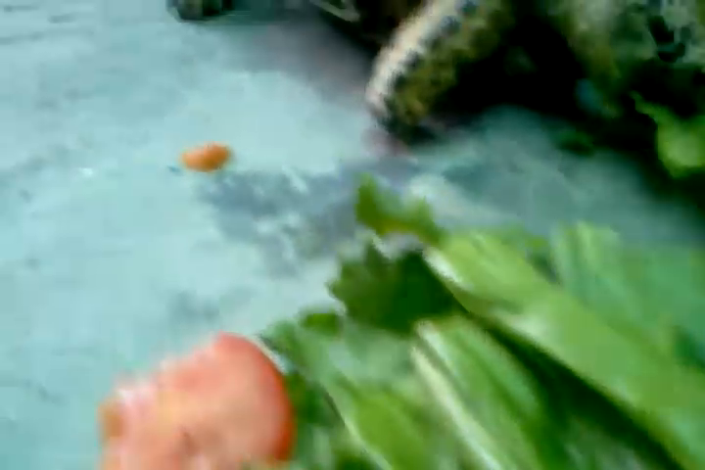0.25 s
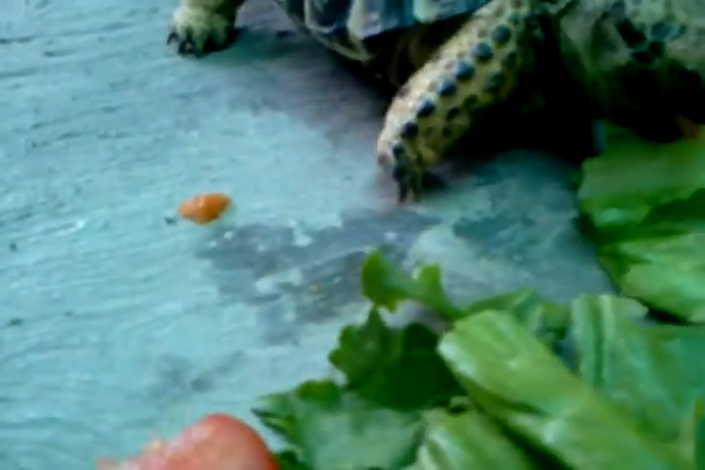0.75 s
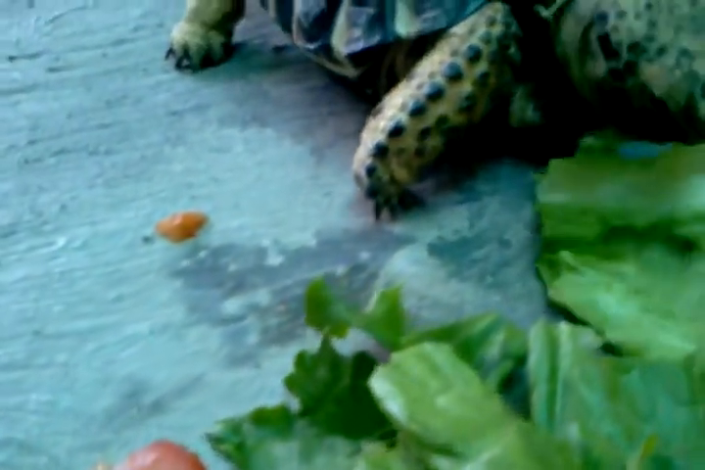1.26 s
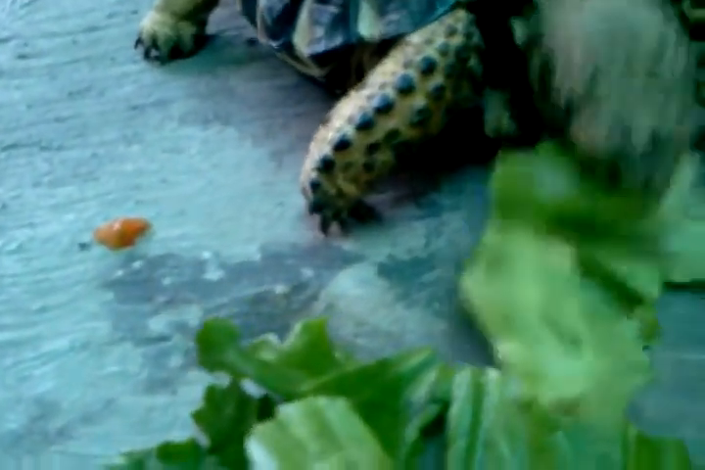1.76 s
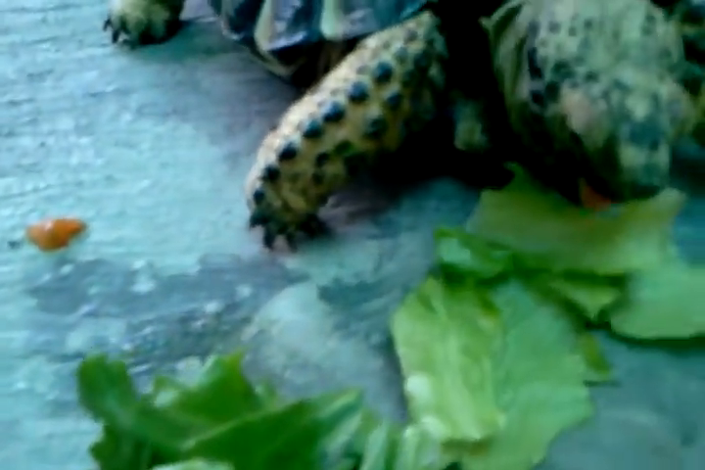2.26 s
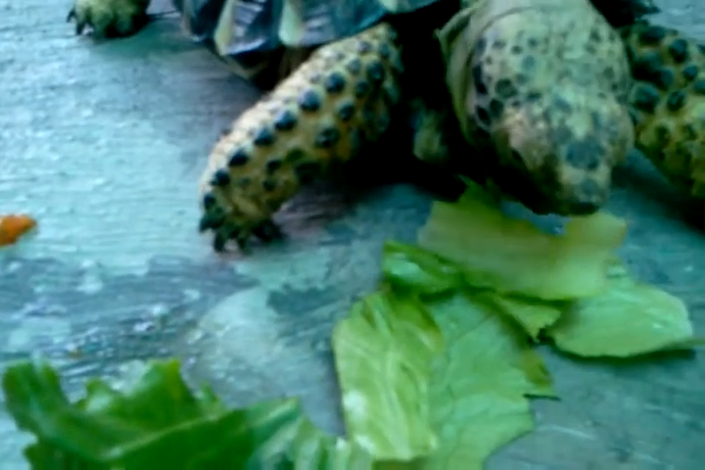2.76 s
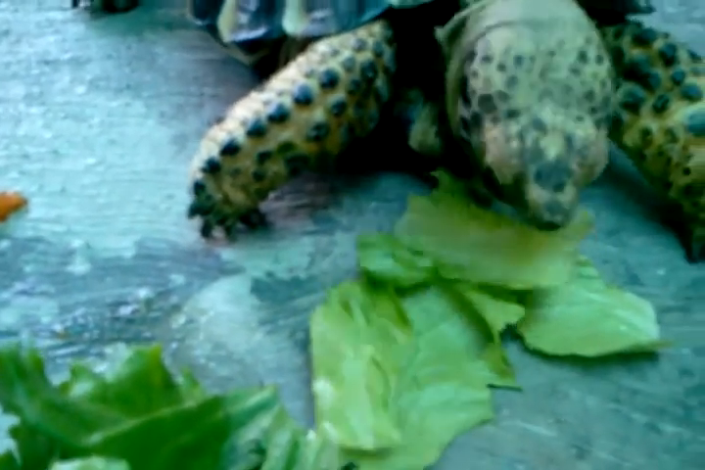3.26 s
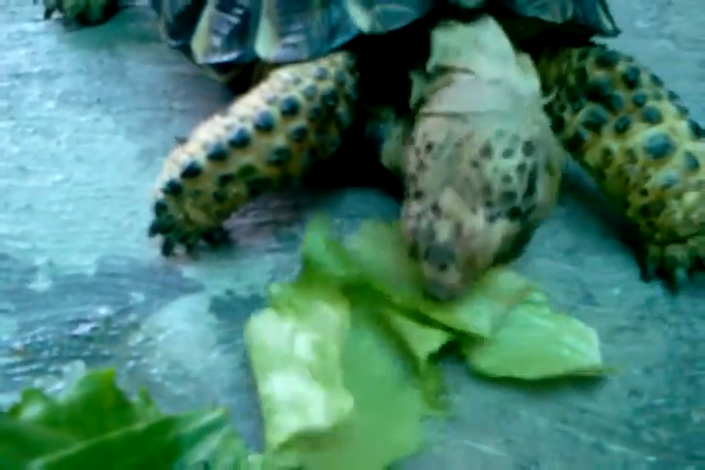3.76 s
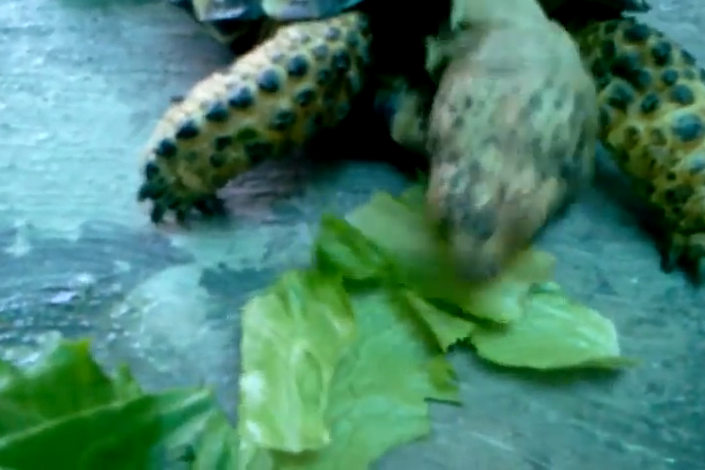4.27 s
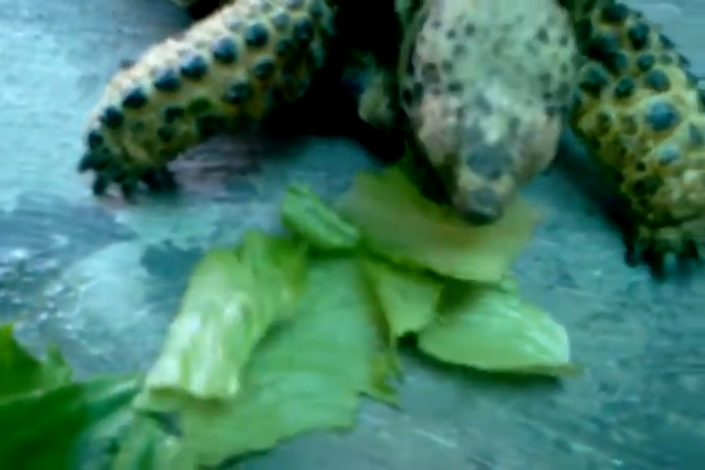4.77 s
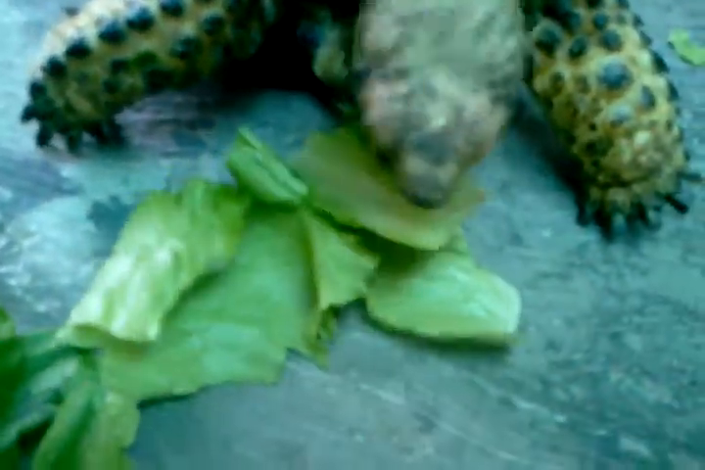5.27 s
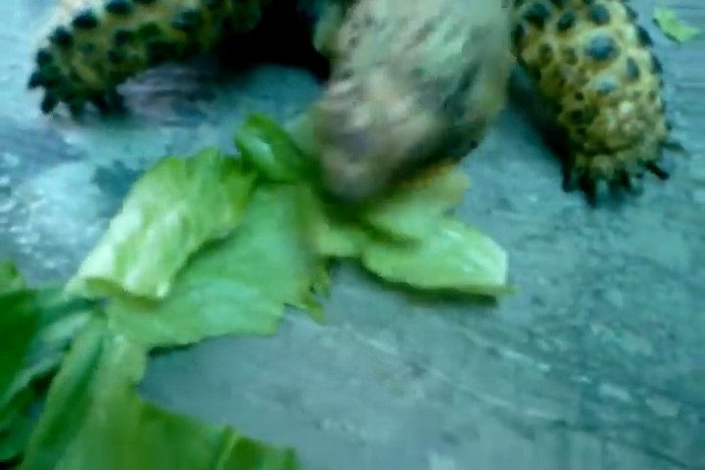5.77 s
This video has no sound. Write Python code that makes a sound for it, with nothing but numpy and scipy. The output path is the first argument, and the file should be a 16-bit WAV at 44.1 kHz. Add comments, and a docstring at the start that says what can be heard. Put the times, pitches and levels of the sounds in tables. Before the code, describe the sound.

Close to a small camera microphone in a quiet, bare-walled room, a tortoise eats lettuce on a hard floor. Short, dry, crisp bites come roughly every 0.7 seconds, some doubled, each a tiny burst of crackling leaf and snapping rib. After a pause with only faint leaf drags and ticks, three more bites follow. Low rumble, faint hum and hiss run throughout.

```python
"""A tortoise eats lettuce on a hard floor indoors, close to a small camera: rumble, faint hum and hiss throughout.
Leaf drags faintly at 0.08 s; bites follow from 0.3 to 3.2 s, about 0.7 s apart, some doubled, with faint drags.
A gap with two more drags precedes the last three bites, at 4.5, 5.2 and 5.9 s. The room answers briefly.
Each bite crushes leaf (random cell bursts through resonances); ribs snap (decaying noise through resonances)."""
import sys
import numpy as np
from scipy import signal
from scipy.fft import rfft, irfft, next_fast_len
from scipy.io import wavfile
from scipy.ndimage import map_coordinates

SR = 44100
rng = np.random.default_rng(int(sys.argv[2]) if len(sys.argv) > 2 else 0)


def unload_wav(signal):
    """Save mono or channel-first audio to the path in sys.argv[1] as 16-bit WAV at rate SR, clipped to [-1, 1]."""
    wavfile.write(
        sys.argv[1],
        SR,
        np.round(np.clip(np.atleast_2d(signal).T, -1, 1) * 32767).astype(np.int16),
    )


N = 265923

# Room rumble spectrum, scaled to rms 1 in use: [freq_hz, relative_density_db]
RUMBLE_SPECTRUM = [(22, -13), (42, -2.5), (54, -10.5), (63, -9.5), (78, -3), (100, -9.5), (124, -5.5),
                   (165, -9), (210, -6), (300, -12.5), (470, -12.5), (640, -17), (1500, -24.5),
                   (3000, -44.5)]
# Microphone hiss spectrum, peak at its port resonance, scaled to rms 1 in use: [freq_hz, relative_density_db]
HISS_SPECTRUM = [(300, -15), (1800, -6), (3300, -9), (4200, -9), (4650, -4), (5000, 1.5), (5400, -8.5),
                 (6000, -12.5), (7300, -14.5), (8000, -18.5), (9000, -38.5)]
# Appliance hum lines; a random sway adds to the level: [freq_hz, start_rms_db, end_rms_db, phase_drift_rad]
HUM_LINES = [(119.8, -54.5, -57.5, .9), (135.1, -62.5, -55, 1.5), (687, -72, -66.5, 2.2),
             (875.6, -65, -64.5, 0.96)]
# Colour of the room's answer: [freq_hz, relative_level_db]
ROOM_COLOUR = [(500, -4.5), (2200, 5.5), (3200, 2.5), (4900, 1), (6000, 0), (7200, 2), (9000, 4.5)]
# Room decay: [freq_hz, t60_s]
ROOM_DECAY = [(500, 0.2), (4500, 0.41), (9000, 0.34)]
# Colour of the leaf sounds at the microphone: [freq_hz, gain_db]
PRESENCE = [(600, -3), (1100, -0.5), (2100, -0.5), (2800, -1.5), (3600, 2.5), (5000, 0.5), (6200, -1.5),
            (7200, 3.5), (7900, -1), (8700, -1.5)]
# Loose leaves dragged over the floor, level before trim: [start_s, length_s, level_db, pitch_hz]
DRAGS = [(0.084, 0.15, -58.5, 7300), (0.958, 0.075, -56.5, 5200), (2.496, .042, -54, 5000),
         (3.506, .044, -54.5, 4700), (3.757, 0.086, -55.5, 4580)]
# Bites and tugs, crackle level before trim, crisp width before spread; grip and knock relative:
# [start_s, length_s, crackle_db, grip_db, crisp_hz, crisp_width_hz, knock_db, knock_hz, knock_width_hz]
BITES = [(.275, 0.049, -38.5, -5, 5800, 2100, -9, 1930, 1700),
         (1.076, 0.034, -43.5, -10.5, 5760, 850, -19, 1930, 1390),
         (1.723, .042, -38.5, -9.5, 5150, 1250, -9, 1680, 1100),
         (1.794, 0.015, -33, -14, 5400, 1700, -7.5, 1770, 1110),
         (2.457, 0.012, -45.5, -15, 4980, 1100, -9, 1270, 800),
         (3.121, 0.033, -44.5, -16, 4840, 1300, -10, 1450, 1200),
         (3.173, 0.018, -46.5, -18, 5000, 850, -9, 1050, 700),
         (4.476, 0.036, -32.5, -14.5, 5130, 1340, -13.5, 1860, 1400),
         (5.162, 0.038, -48, -7.5, 4650, 1510, -18, 2020, 600),
         (5.861, 0.035, -39.5, -18.5, 4460, 1500, -9.5, 2080, 596)]
# Rib and edge snaps, loud ones in the bites and faint ticks between;
# crisp level over 1 ms, knock relative to it: [start_s, level_db, crisp_hz, knock_db, t60_s]
SNAPS = [(0.2618, -32.5, 6400, -4, 0.0022), (.2686, -35, 5870, -16, 0.0018),
         (0.2777, -14.5, 6200, -14, 0.0051), (0.2844, -27, 6700, -16, .003), (0.2953, -26, 6700, -9, .002),
         (.3012, -31.5, 5600, -6, 0.0016), (0.3092, -20, 5470, -3, 0.0049), (0.3202, -30, 6300, -15, 0.008),
         (0.3571, -27.5, 6800, -6, 0.0052), (0.7014, -44.5, 4030, -7, .003), (.83, -46, 5700, -13, .004),
         (1.0764, -37.5, 6640, -17, 0.0026), (1.0911, -31, 6300, -17, .002),
         (1.1078, -19.5, 5500, -35, 0.0092), (1.1128, -32, 5400, -23, 0.0029),
         (1.2137, -37, 5960, -11, 0.0023), (1.6794, -33.5, 5400, -18, 0.0023),
         (1.6877, -37, 5560, -18, .003), (1.7242, -23, 5050, -15, 0.0031), (1.7336, -28, 5030, -12, .0023),
         (1.738, -18, 5300, -13, 0.011), (1.7488, -26, 5300, -8, .004), (1.7551, -18, 4700, -3, 0.005),
         (1.7637, -21.5, 4730, -10, 0.011), (1.784, -29, 4060, -5.5, .002),
         (1.7952, -27.5, 4800, -2.5, 0.0014), (1.81, -31, 5100, -13, .0025), (1.82, -34, 5960, -7, 0.0025),
         (2.2925, -45, 5600, -11, 0.0022), (2.4577, -33, 5400, -7.5, 0.019),
         (2.944, -39, 5560, -25, 0.0012), (3.0164, -44.5, 4700, -8, .0015), (3.1225, -39, 4600, -8, 0.0054),
         (3.1747, -29, 5600, -6.5, 0.0049), (3.1805, -29.5, 4770, -23, .004),
         (3.1917, -35, 4980, -22, 0.0078), (4.211, -48, 5960, -15, .003), (4.4776, -25, 5450, -5, 0.0032),
         (4.4888, -20.5, 5500, -10, 0.0022), (4.4971, -24.5, 5540, -11, .003),
         (4.5039, -19, 4870, -15, 0.0016), (4.5094, -25, 5000, -23, 0.0019),
         (4.5291, -33, 4770, -11, .0026), (4.536, -33.5, 4700, -14, .002), (4.6265, -42.5, 4700, -8, .003),
         (4.689, -44, 4630, -4, 0.0031), (5.1609, -39.5, 4000, -4, .004), (5.182, -25, 4630, -3.5, 0.02),
         (5.8677, -32.5, 4200, -16, .004), (5.902, -29, 4370, 0, 0.014)]

# Bite pressure: grip swells, presses home, holds, lets go; the torn leaf crackles on, fading
GRIP_S, GRIP_SWELL_DB, PRESS_S, LET_GO_S = 0.065, 8.5, 0.0061, 0.0092
AFTER_DB, AFTER_FADE_DB_PER_S = -11, 230
TOP_HZ = 9200  # nothing passes above


def amp(db):
    """Decibels to gain."""
    return 10 ** (np.asarray(db) / 20)


def unit(x):
    """Scale to rms 1."""
    return x / np.sqrt(np.mean(x ** 2) + 1e-20)


def along(points, hz):
    """Interpolate (Hz, value) points on a log-frequency axis."""
    freq_hz, values = np.transpose(points)
    return np.interp(np.log(hz + 1), np.log(freq_hz), values)


def wobble(knots_per_s):
    """Smooth random curve through normal-distributed knots."""
    knots = rng.standard_normal(int(N * knots_per_s / SR) + 4)
    return map_coordinates(knots, [np.arange(N) * knots_per_s / SR])


def filtered(x, response):
    """Multiply the spectrum of x by a response of frequency."""
    size = next_fast_len(N + SR // 2)
    hz = np.fft.rfftfreq(size, 1 / SR)
    return irfft(rfft(x, size) * response(hz), size)[:N]


def noise(spectrum):
    """Steady noise of rms 1 with the given colour."""
    return unit(filtered(rng.standard_normal(N), lambda hz: amp(along(spectrum, hz))))


def ring(x, hz, width_hz, order=1):
    """Pass x through one resonance; rms 1."""
    edges_hz = np.clip([hz - width_hz / 2, hz + width_hz / 2], 100, SR / 2 - 100)
    sos = signal.butter(order, edges_hz, "bandpass", fs=SR, output="sos")
    return unit(signal.sosfilt(sos, x))


def add(track, start_s, x):
    """Mix x into the track at start_s."""
    part = track[max(round(start_s * SR), 0):][:len(x)]
    part += x[:len(part)]


def background(rumble_db=-49, hiss_db=-58.0, sway_db=2):
    """Coloured-noise rumble and hiss; hum sines that waver in phase and strength."""
    t = np.arange(N) / SR
    hum = np.zeros(N)
    for hz, start_db, end_db, drift_rad in HUM_LINES:
        level = amp(np.linspace(start_db, end_db, N) + sway_db * wobble(3.926))
        phase_rad = 2 * np.pi * hz * t + drift_rad * wobble(8)
        hum += level * np.sqrt(2) * np.sin(phase_rad)
    rumble = amp(rumble_db + 0.16 * wobble(5)) * noise(RUMBLE_SPECTRUM)
    hiss = amp(hiss_db + 0.28 * wobble(15.0)) * noise(HISS_SPECTRUM)
    return rumble + hum + hiss


def room(x, delay_s=0.003):
    """Diffuse tail from bare walls: noise decaying at a rate set by frequency."""
    hz, t, grains = signal.stft(rng.standard_normal(SR // 2), SR, nperseg=256)
    decay_db = 60 * t / along(ROOM_DECAY, hz)[:, None]
    shape_db = along(ROOM_COLOUR, hz)[:, None] - decay_db
    tail = signal.istft(grains * amp(shape_db), SR, nperseg=256)[1]
    # silent for delay_s, full after twice that
    tail *= np.clip(np.arange(len(tail)) / SR / delay_s - 1, 0, 1)
    return signal.fftconvolve(x, tail / np.linalg.norm(tail))[:N]


def settling(ticks_per_s=7, scatter_db=4, level_db=-75, hz=5200, width_hz=3200):
    """Loose leaves shift: very faint random ticks through one resonance."""
    sizes = amp(scatter_db * np.clip(rng.standard_normal(N), -2, 1))
    ticks = (rng.random(N) < ticks_per_s / SR) * sizes
    return amp(level_db) * ring(ticks, hz, width_hz, order=2)


def crackle(pressure, hz, knock_db, knock_hz, knock_width_hz, cells_per_s, scatter_db,
            width_hz=1700, edge_db=-5, edge_hz=5500, edge_width_hz=4600):
    """Cells burst at random: cracks of uneven size, shaped by pressure, through the leaf's resonances."""
    size = len(pressure)
    bursts = rng.random(size) < cells_per_s / SR
    sizes = amp(scatter_db * np.clip(rng.standard_normal(size), -2, 2))
    # random signs make three independent drives
    crack, edge, push = pressure * bursts * sizes * rng.choice([-1, 1], (3, size))
    broad = amp(edge_db) * ring(edge, edge_hz, edge_width_hz)
    crisp = unit(ring(crack, hz, width_hz, order=2) + broad)
    knock = amp(knock_db) * ring(push, knock_hz, knock_width_hz, order=2)
    return np.sqrt(np.mean(pressure ** 2)) * (crisp + knock)


def dragging(swell_share=0.21, fade_s=0.012, trim_db=-2):
    """A dragged leaf crackles more thinly than a bitten one; it swells gradually and stops quickly."""
    track, t = np.zeros(N), np.arange(SR // 5) / SR
    for start_s, length_s, level_db, hz in DRAGS:
        swell = t / (swell_share * length_s)
        fade = (length_s - t) / fade_s + 0.5
        pressure = np.clip(np.minimum(swell, fade), 0, 1)
        cells = crackle(pressure, hz, knock_db=-14, knock_hz=1700, knock_width_hz=1700,
                        cells_per_s=1100, scatter_db=3)
        add(track, start_s, amp(level_db + trim_db) * cells)
    return track


def crushing(trim_db=-0.5, spread=1.14):
    """The beak grips, presses and lets go; the many cells spread wider in pitch than one rib."""
    track, t = np.zeros(N), np.arange(SR // 3) / SR - GRIP_S
    for (start_s, length_s, crackle_db, grip_db, hz, width_hz,
         knock_db, knock_hz, knock_width_hz) in BITES:
        times_s = [-GRIP_S, -PRESS_S, 0, length_s, length_s + LET_GO_S]
        levels_db = [grip_db - GRIP_SWELL_DB, grip_db, 0, 0, AFTER_DB]
        pressure_db = np.interp(t, times_s, levels_db)
        pressure_db -= AFTER_FADE_DB_PER_S * np.maximum(t - length_s, 0)
        cells = crackle(amp(pressure_db), hz, knock_db, knock_hz, knock_width_hz,
                        cells_per_s=1500, scatter_db=4.5, width_hz=spread * width_hz)
        add(track, start_s - GRIP_S, amp(crackle_db + trim_db) * cells)
    return track


def snaps(first_db=10, edge_db=-8, edge_hz=5600, edge_width_hz=4600):
    """A crack runs through a rib: it rings crisply and the mouth knocks as in the nearest bite."""
    track, t = np.zeros(N), np.arange(SR // 40) / SR
    one_ms = np.sqrt(0.001 * SR / len(t))  # sets the energy as if the level lasted 1 ms
    for start_s, level_db, hz, knock_db, t60_s in SNAPS:
        bite = min(BITES, key=lambda b: abs(b[0] + b[1] / 2 - start_s))
        *_, width_hz, _, knock_hz, knock_width_hz = bite
        # one clean break, then the rest of the rib tears
        tearing = amp(-60 * t / t60_s) * rng.standard_normal((3, len(t)))
        crack, edge, push = amp(first_db) * (t == 0) + tearing
        # the breaking edge adds a broad tick
        broad = amp(edge_db) * ring(edge, edge_hz, edge_width_hz)
        crisp = unit(ring(crack, hz, width_hz, order=2) + broad)
        knock = amp(knock_db) * ring(push, knock_hz, knock_width_hz, order=2)
        add(track, start_s, amp(level_db) * one_ms * (crisp + knock))
    return track


def scene(room_db=-10):
    """Leaf sounds and their echo over the quiet room."""
    leaves = settling() + dragging() + crushing() + snaps()
    leaves = filtered(leaves, lambda hz: amp(along(PRESENCE, hz)))
    return (background() + amp(room_db) * room(leaves) + leaves)[None]


def record(dry, rolloff_hz=8050, order=18, edge_hz=8750):
    """The camera's treble rolls off ever more steeply and ends at its band limit."""
    def response(hz):
        rolloff = 1 + (hz / rolloff_hz) ** (2 * order)
        edge = 1 + (hz / edge_hz) ** (6 * order)
        return (hz < TOP_HZ) / np.sqrt(rolloff * edge)
    return filtered(dry[0], response)[None]


dry = scene()
out = record(dry)
unload_wav(out)
```